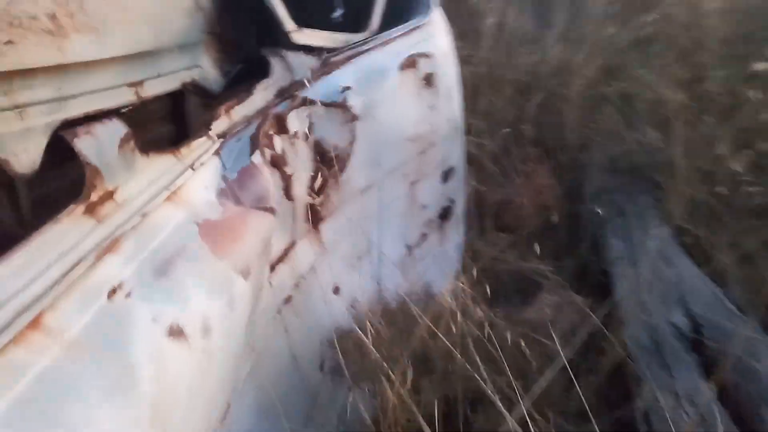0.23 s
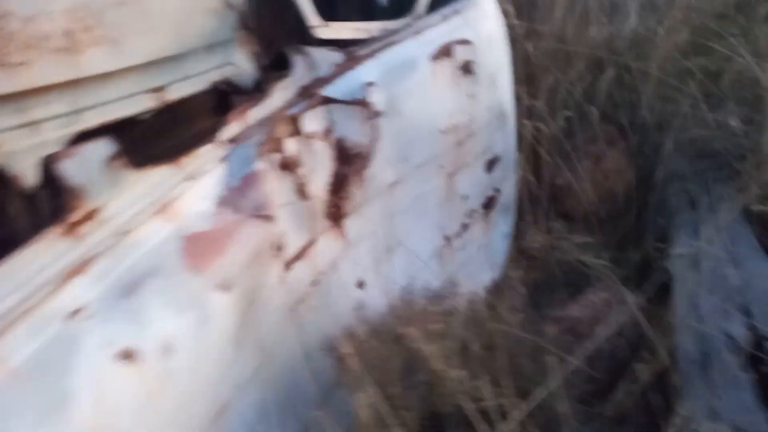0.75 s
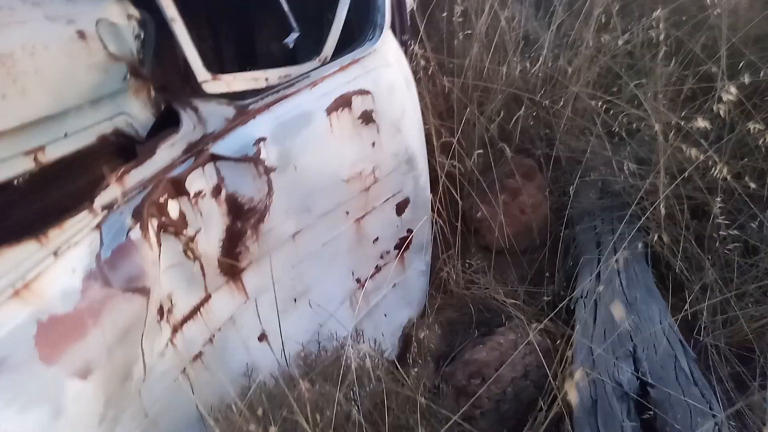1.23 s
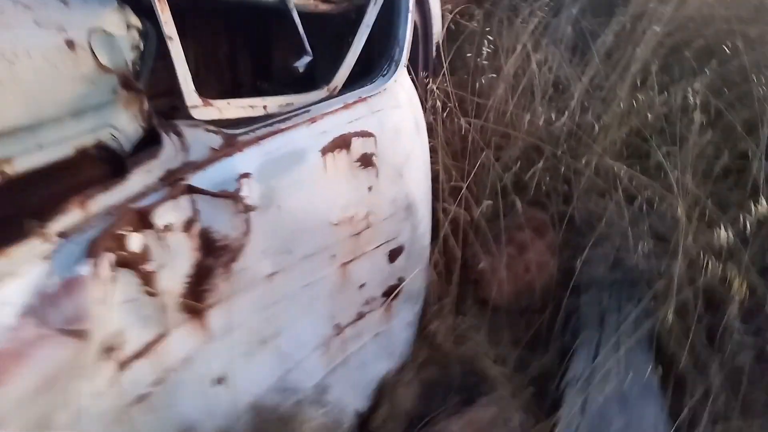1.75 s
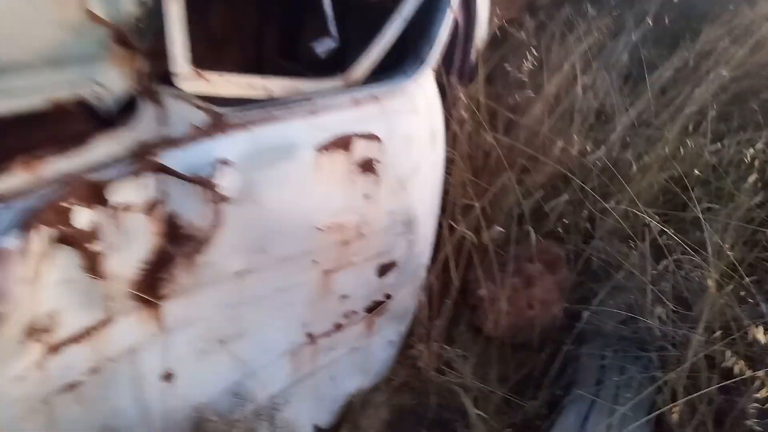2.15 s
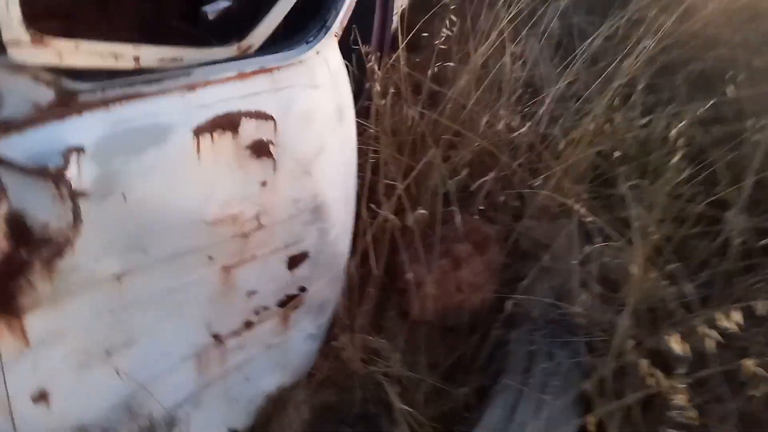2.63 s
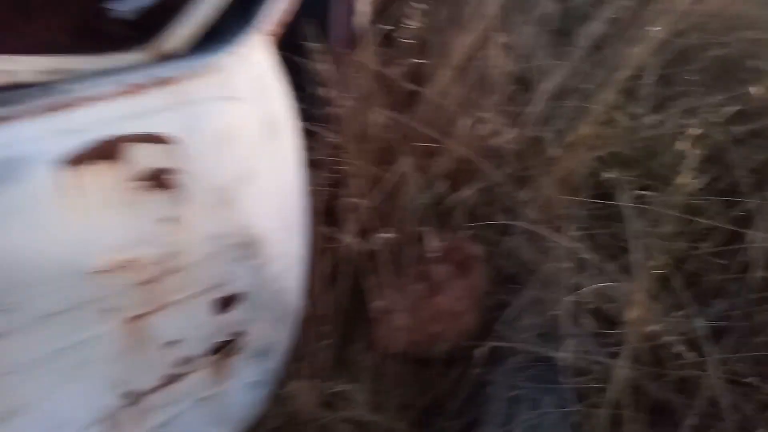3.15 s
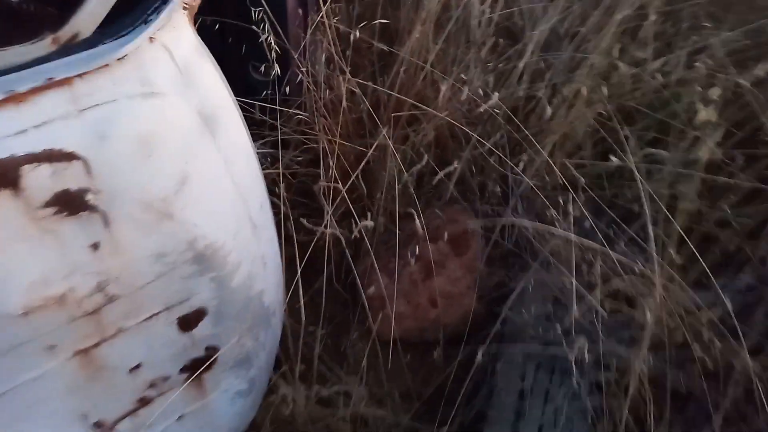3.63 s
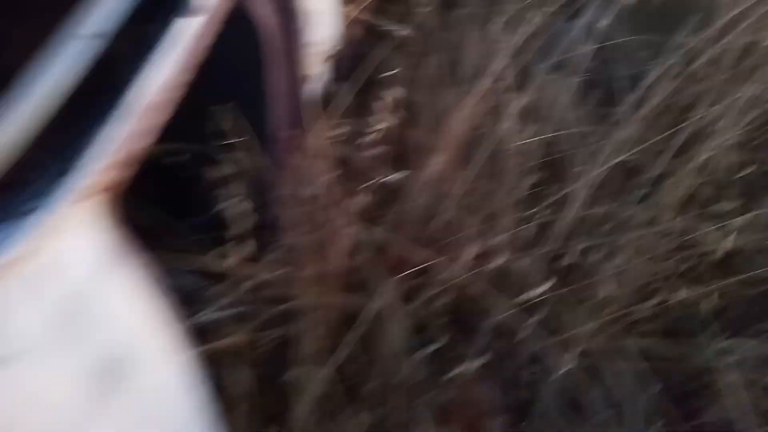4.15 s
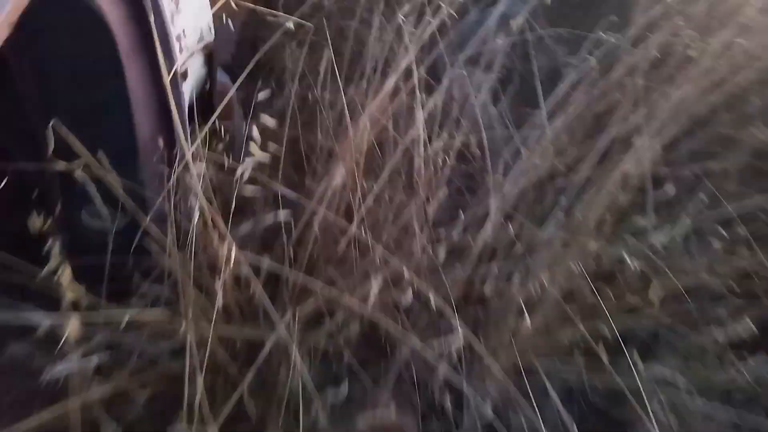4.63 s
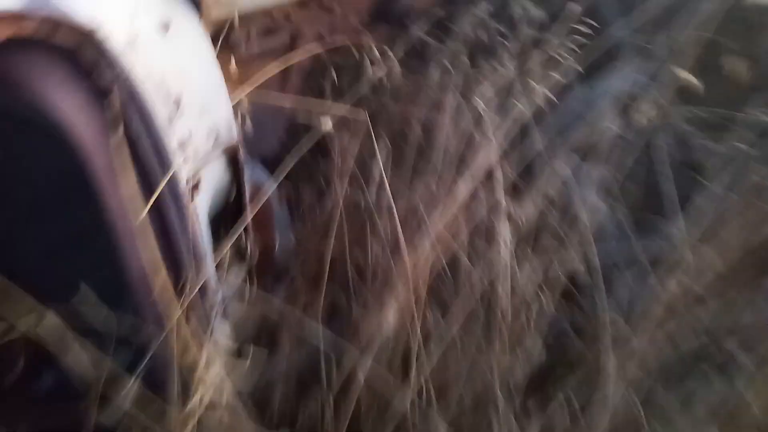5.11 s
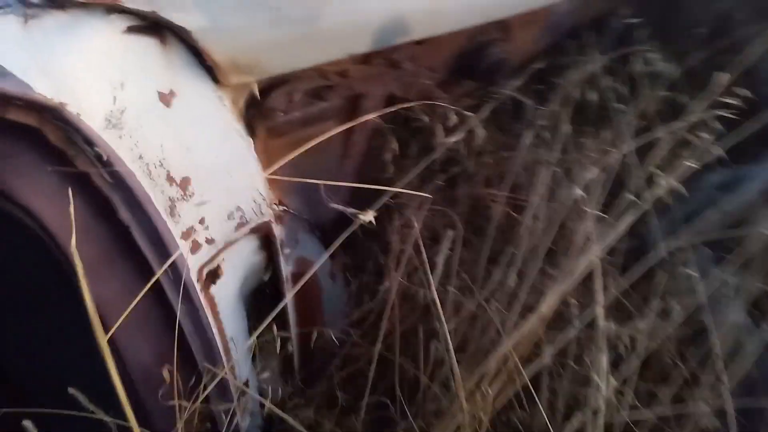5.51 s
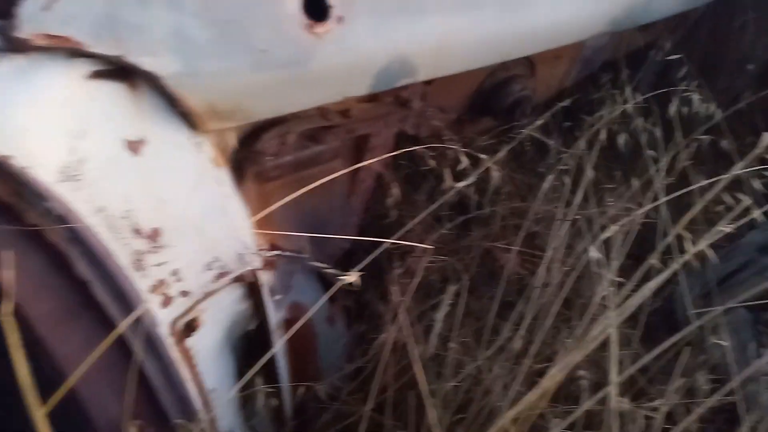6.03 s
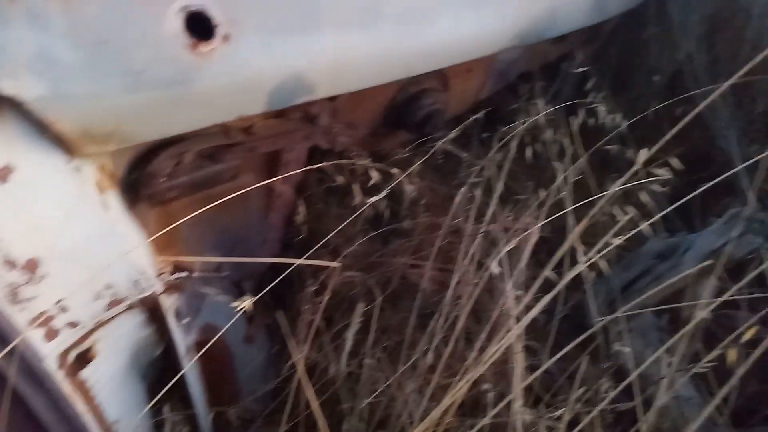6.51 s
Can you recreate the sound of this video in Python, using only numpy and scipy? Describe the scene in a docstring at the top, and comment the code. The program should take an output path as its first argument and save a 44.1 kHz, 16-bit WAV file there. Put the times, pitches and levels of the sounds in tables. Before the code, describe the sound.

Very close, dry outdoor sound of someone moving slowly through tall brittle grass, about seven seconds. From 0 to 0.6 s, a dense, bright burst of swishing with crisp ticks, snaps and soft low thuds. A gentler brush follows near 0.9 to 1.3, then sparse snaps and a firm thud with a crack at 1.8. Another strong, fizzy sweep peaks around 2.15. Small rustles, low handling bumps and quiet footfalls continue, the bump strongest near 2.75. At 3.2 to 3.5 a brush ends in woody cracks and thuds; at 3.7 a bunch snaps loudly and sharply. It quiets, with a soft swish at 4.2. From 4.8 the treble closes down; duller brushes come at 5.2 to 5.5. After 5.7 it is nearly still: a thin, faint high hiss, tiny muffled rustles around 6.4, and a last brush near 6.8.

```python
"""Dry stalks swish, tick and snap from the start, as someone wades slowly through tall grass.
Filtered noise and ticks make the swish, short ringing bursts the snaps, soft low pushes the thuds.
Air and grip bump the handheld microphone with lumpy low noise; past the middle one bunch cracks loudly.
Near the end something, perhaps a hand, shades the microphone port: the treble goes, the port rings lower,
and a thin high hiss that was barely there grows."""
import sys
import numpy as np
from scipy import signal
from scipy.fft import rfft, irfft, next_fast_len
from scipy.io import wavfile
from scipy.ndimage import uniform_filter1d

SR = 44100
rng = np.random.default_rng(int(sys.argv[2]) if len(sys.argv) > 2 else 0)


def to_wav(sig):
    """Store sig (one row per channel, or 1-D mono) as 16-bit WAV at the path in sys.argv[1].

    Samples outside -1..1 are clipped; the rate is SR.
    """
    pcm = np.clip(np.atleast_2d(sig), -1, 1) * 32767
    pcm = np.round(pcm).astype(np.int16)
    wavfile.write(sys.argv[1], SR, pcm.T)  # frames by channels


N = 298716  # length in samples

# Legs sweeping through stalks: full at t/s, held t/s, swish level/dB, rise in s per 10 dB,
# fall in s per 10 dB, rustle level/dB against the swish, thick stems level/dB against the swish
STROKES = [(.01, .08, -50, .1, .1, -10, -19), (.13, .02, -45.5, .06, .07, -6, -8),
           (.281, .005, -43.5, .05, .045, -7, -12), (.368, .005, -48, .07, .07, -9, -15),
           (.5, .02, -53, .2, .08, -4, -14), (.6, .005, -54, .07, .18, -3, -13),
           (.904, .22, -52.5, .12, .4, -6, -15), (1.43, .005, -56, .2, .09, -8, -19),
           (1.72, .005, -62, .08, .1, -1.5, -4), (1.8, .005, -56, .06, .06, 5, .1),
           (1.864, .22, -52.5, .08, .3, -7, -18), (2.17, .054, -44, .1, .06, -9, -20),
           (2.39, .005, -55, .15, .12, -9, -15), (2.551, .005, -56, .04, .05, 4, -11),
           (2.662, .005, -59, .08, .05, 1.1, -7), (2.765, .005, -64, .05, .05, 3, -9),
           (2.854, .005, -63, .05, .05, 5, 1.5), (2.936, .04, -61, .04, .06, 3, -6),
           (3.066, .06, -53, .1, .25, -1.5, -15), (3.33, .09, -57, .1, .025, -10, -25),
           (3.519, .005, -58, .08, .035, -6, 1.1), (3.64, .005, -62, .15, .05, -8, -16),
           (3.725, .005, -60, .02, .025, 19, 8), (3.79, .005, -66, .05, .2, -6, -11),
           (3.97, .005, -69, .06, .05, -6, -12), (4.081, .005, -65, .07, .07, -7, -3),
           (4.205, .18, -55.5, .007, .06, -8, -21), (4.537, .005, -63, .1, .12, -4, -9),
           (4.682, .005, -57, .07, .08, -6, -15), (4.858, .005, -56.5, .08, .07, -6, -3),
           (5.008, .005, -61, .07, .05, .1, -.6), (5.11, .005, -63.5, .05, .04, -3, 1.1),
           (4.79, .005, -65, .04, .04, 1.5, -9), (5.177, .005, -55.5, .08, .12, -11, -30),
           (5.314, .005, -49.5, .08, .09, -1.5, -18), (5.513, .005, -50.5, .045, .04, -7, -26),
           (5.598, .005, -63.5, .05, .02, 1.5, -11), (5.74, .02, -67, .12, .07, -15, -15),
           (6.33, .005, -62, .03, .06, -13, -24), (6.39, .005, -62, .04, .05, -8, -23),
           (6.46, .005, -61, .04, .055, -14, -21), (6.685, .005, -62, .04, .1, -7, -13),
           (6.77, .005, -57, .09, .1, -15, -25)]
# Swish of stalks settling between strokes: t/s, level/dB
SETTLING = [(0, -60), (.8, -67), (1.58, -73), (2.3, -67), (2.75, -74), (3.3, -68), (3.8, -72), (4.17, -76),
            (4.9, -68), (5.5, -69), (5.65, -77), (5.9, -80), (6.77, -80)]
# Colour of the grass through the free port: f/Hz, level/dB
OPEN_PORT = [(50, -44), (120, -22), (250, -10), (600, -9), (1200, -11), (2100, -6), (5000, -6), (6600, -1),
             (8000, -5), (8900, 0), (9400, -2), (10400, -13), (13500, -21), (14600, -8), (15700, -9)]
# Colour of the grass through the shaded port: f/Hz, level/dB
SHADED_PORT = [(50, -40), (120, -23), (250, -19), (600, -28), (1200, -26), (2500, -19.5), (3700, -13),
               (5400, -6.5), (6750, -2), (7450, -3), (8300, -16), (9700, -33.5), (12600, -49), (14000, -34),
               (15200, -24)]
# How far the port is shaded: t/s, share of the shaded colour (0 to 1)
SHADE = [(4.5, 0.11), (4.9, 0.31), (5.1, 0.7), (5.3, 0.9), (5.55, 0.87), (5.7, 0.95)]
# Borders between thick stems, rustle, swish and fizz: f/Hz
PART_EDGES_HZ = (1200, 4000, 13200)
# Middle pitch of the ticks of each stalk size: f/Hz
STALK_HZ = (700, 1600, 3000, 5000, 7500, 11000)
# Air and grip on the microphone: t/s, level/dB, rise in s per 10 dB, fall in s per 10 dB
BUMPS = [(.15, -62, .035, .035), (.26, -76, .06, .06), (.47, -71, .07, .045), (.94, -76, .1, .17),
         (1.49, -85, .2, .2), (1.795, -65, .014, .035), (1.9, -73, .08, .08), (2., -67, .08, .04),
         (2.11, -70, .06, .06), (2.42, -70, .06, .08), (2.535, -63, .035, .011), (2.63, -66, .03, .04),
         (2.7, -58, .025, .025), (2.745, -52, .02, .035), (2.865, -67, .04, .022), (2.97, -57, .03, .014),
         (3.36, -82, .06, .02), (3.49, -67, .015, .025), (3.58, -75, .015, .04), (3.69, -72, .01, .035),
         (3.85, -75, .045, .07), (4.02, -82, .04, .12), (4.3, -88, .2, .2), (4.53, -71, .045, .035),
         (4.64, -77, .08, .05), (4.815, -69, .014, .018), (4.88, -76, .02, .09), (5.07, -69, .09, .016),
         (5.22, -75, .045, .11), (5.6, -82, .03, .05), (5.79, -82, .1, .06), (6.15, -90, .3, .3),
         (6.47, -80, .12, .035), (6.73, -77, .08, .2)]
# Colour of the bumps: f/Hz, level/dB
BUMP_COLOUR = [(18, -37.5), (30, -28), (51, -4.5), (75, 1), (146, -5.5), (180, -11), (230, -33),
               (400, -120)]
# Thin hiss at full shade: middle f/Hz, width f/Hz, level/dB
THIN_HISS = (7300, 310, -69)
# Feet and thick stems meeting the ground: t/s, peak level/dB, ring f/Hz
THUDS = [(.072, -50, 496), (.142, -45.5, 567), (.289, -52, 517.8), (.355, -53, 357), (.525, -59, 385),
         (.851, -55, 436), (1.004, -58, 340.4), (1.434, -49, 490), (1.471, -53.5, 290), (1.615, -52.5, 600),
         (1.784, -38, 611.9), (1.808, -46.5, 304), (2.22, -52, 427), (2.376, -58, 322.3), (2.501, -50, 573),
         (2.542, -47.5, 569.8), (2.66, -54.5, 233), (2.759, -47.5, 440), (2.854, -57, 502.4),
         (2.919, -51, 416.3), (3.223, -49, 749.2), (3.443, -47.5, 350), (3.473, -39, 325),
         (3.499, -43, 276.2), (3.71, -32.5, 527), (3.722, -41, 282), (3.76, -48, 242), (3.834, -57, 164.3),
         (4.043, -64, 332), (4.468, -60.5, 275.5), (4.59, -63.5, 484), (4.741, -60, 352), (4.808, -58, 323),
         (4.842, -47.5, 317.3), (4.981, -61, 566), (5.042, -62, 149), (5.06, -61, 146), (5.09, -62, 450),
         (5.588, -59.5, 267.2), (6.663, -65.5, 220.6)]
# Stalks breaking at set moments, from faint to loud: t/s, peak level/dB, ring f/Hz,
# thick part level/dB, fine part level/dB (both parts are set against the middle of the snap)
SNAPS = [(.0747, -21.5, 6800, -41, -29), (.0785, -32, 7300, -21, -19), (.1338, -25, 6400, -27, -25),
         (.1454, -29, 9000, -30, -23), (.1522, -27, 5860, -23, -18), (.1583, -33, 7860, -0.5, -19),
         (.1634, -36, 5000, -21, -18), (.249, -29, 8700, -31.5, -25), (.2693, -34.5, 5040, -17, -21),
         (.2754, -34, 5500, -24, -26), (.2867, -27, 9060, -27, -23), (.2918, -29.5, 6620, -31, -17),
         (.2974, -36, 7000, -30, -16), (.3061, -30, 9100, -38, -23), (.3446, -27, 6800, -41, -21),
         (.3604, -25, 9470, -28, -22.5), (.3783, -28.5, 8500, -13, -18), (.385, -29.5, 6540, -18, -14),
         (.4607, -31.5, 5040, -28.5, -27), (.5004, -40, 5000, -27, -24), (.5293, -28.5, 3500, -23, -31),
         (.537, -34.5, 3560, -34, -34), (.587, -26.5, 3150, -16.5, -17), (.6, -31, 5800, -32.5, -18),
         (.637, -31, 6900, -31, -31), (1.0148, -39, 4500, 6.5, -18.5), (1.1017, -36, 8900, -31, -22),
         (1.2448, -37, 8840, -36.5, -11.5), (1.2852, -35.5, 8880, -16, -4), (1.3188, -26, 6000, -13, -28),
         (1.4268, -24.5, 2780, 1.5, -43), (1.4697, -36.5, 7000, -26, -27), (1.6404, -30.5, 3600, -18, -29),
         (1.657, -36, 4630, -20, -21), (1.684, -37, 9180, -12, -2), (1.782, -32.5, 2360, -10.5, -9),
         (1.7882, -22, 3200, -11, -19), (1.8126, -28.5, 3640, -12, -2), (1.8327, -33.5, 3670, -23, -20),
         (1.951, -37, 8990, -34, -28), (2.0128, -37, 8600, -35, -28), (2.0632, -36.5, 9400, -30, -20),
         (2.1273, -30, 8400, -31.5, -15), (2.1437, -24.5, 8880, -46, -22), (2.153, -18.5, 8900, -52, -8),
         (2.1778, -25, 7040, -34.5, -4), (2.1938, -26.5, 8990, -35.5, -12), (2.199, -24.5, 2930, -22, -21),
         (2.2182, -34, 7320, -21, -21), (2.2404, -33, 6630, -24.5, -22), (2.4264, -38, 8600, -34, -20),
         (2.5454, -25.5, 2600, -4, -31), (2.5539, -31.5, 4000, -27, -33.5), (2.665, -36.5, 2060, -11, -19),
         (2.8116, -41, 3440, -24, -35), (2.8403, -43.5, 3710, -24, -28), (2.9034, -37.5, 7190, -23, 18),
         (2.9178, -45, 3040, -8.5, -22), (2.936, -42.5, 1870, -15, -22), (3.222, -24, 3980, -34, -21),
         (3.2274, -33, 2650, -30, -35), (3.2754, -37.5, 4180, -22.5, -19), (3.2882, -29.5, 4000, -38, -9),
         (3.3084, -52, 6630, -21, -19), (3.3613, -40, 6000, -32.5, -25), (3.4396, -35, 1840, -9, -35),
         (3.4662, -35, 3280, -4, -43), (3.47, -30, 2720, -26.5, -45.5), (3.4745, -23, 1800, 4.5, -41.5),
         (3.4779, -19.5, 1410, -28, -42), (3.4874, -34, 3000, -28.5, -47), (3.4917, -31, 2200, -6, -33),
         (3.4953, -28.5, 1800, -2, -58.5), (3.497, -21, 1430, 5, -46.5), (3.5009, -30.5, 2290, -8.5, -40.5),
         (3.549, -41.5, 2680, -26, -23), (3.5926, -43.5, 3548, -27, -26.5), (3.6084, -41.5, 5000, -29, -30),
         (3.6268, -39, 3260, -42, -36.5), (3.6606, -41.5, 1840, -28.5, -37.5), (3.669, -43, 3350, -27, -36),
         (3.6744, -36, 3910, -21, -21.5), (3.683, -28, 6560, -31, -31), (3.6943, -15.5, 3700, -26, -36.5),
         (3.697, -13, 3980, -34, -42.5), (3.7054, -18.5, 4250, -25.5, -30), (3.7095, -18, 3500, -4, -24.5),
         (3.712, -18.5, 5980, -29, -39.5), (3.7165, -22.5, 2210, -13.5, -27),
         (3.7225, -27, 2470, -17.5, -38), (3.7318, -24, 2500, -19, -43), (3.744, -43, 6220, -25.5, -30.5),
         (3.7637, -33, 1590, -12, -28.5), (4.0336, -46.5, 6240, -19, -29), (4.0802, -48, 2700, -6, -27),
         (4.12, -47, 3760, -5, -25), (4.1972, -36, 7040, -40, -24), (4.2382, -34.5, 7850, -31, -11),
         (4.3785, -44, 6200, -40, -14), (4.589, -43.5, 4000, -25, -20.5), (4.6873, -42, 5000, -4, -27),
         (4.8422, -27, 2400, -38.5, -42), (4.8476, -31, 1930, -15, -39), (4.8702, -38.5, 3000, 4, -34),
         (5.0067, -47.5, 2700, -14, -39), (5.1658, -37.5, 6440, -45, -31),
         (5.1949, -36.5, 6300, -51.5, -34), (5.244, -44, 4350, -36, -40.5), (5.2883, -36, 6000, -18, -41),
         (5.3096, -41, 6400, -19, -41), (5.447, -43.5, 5000, -14, -38), (5.4914, -37, 6500, -40, -30),
         (5.5056, -35.5, 5000, -35, -33), (5.59, -49, 1500, 8.5, -34), (5.7554, -57, 6850, -35, -42),
         (5.7725, -57, 6690, -34, -49), (6.322, -49.5, 7000, -40, -45)]

EDGE_HZ = 15750  # nearly nothing sounds above this
TICKS_PER_S = 180  # for each stalk size
TICK_SPREAD_DB, TICK_SHARE = 4.8, .45  # the rest of the swish is smooth hiss
SETTLING_WEIGHT_DB, SETTLING_THICK_DB = -11, -18.5  # rustle and thick stems, against the settling swish
THICK_FLOOR_DB, FIZZ_FLOOR_DB = -85, -103  # always present, even between strokes
# Fizz is the top part, set against the swish: harder, lighter strokes fizz more, a shaded port dulls it
FIZZ_DB, FIZZ_PER_DB, FIZZ_PER_WEIGHT, FIZZ_SHADED_DB = -11.5, .4, -.36, -17
USUAL_SWISH_DB = -55
PATCHES_DB, LONG_PATCHES_DB = .99, 2  # uneven patches; narrower, longer-lasting unevenness of the swish
CALM_DB, CALM_LUMPS_DB = -92, 2.5  # the air between bumps
THUD_T60_S, KNOCK_T60_S = .086, .021  # time to fade by 60 dB
CRACK_T60_S, RATTLE_T60_S = .0032, .026
# Thin, high-ringing stalks break brighter
BRIGHT_DB, BRIGHT_DB_PER_OCTAVE, USUAL_RING_HZ = -1.6, 9, 4000
STALK_LUMPS_DB = 2.5  # uneven ring of each broken stalk
# More breaks fall by chance: the faintest lie about CHANCE_DB above the swish, so strong strokes snap louder
CHANCE_PER_S, CHANCE_DB, CHANCE_SPREAD_DB = 14, 6.5, 2.5
CHANCE_HZ = (3000, 9233.7)  # lowest and highest ring
CHANCE_THICK_DB, CHANCE_FINE_DB = -25.5, -22


def gain_of(db):
    """Turns decibels into a gain."""
    return 10 ** (np.asarray(db) / 20)


def evened(x):
    """Scales to an average strength (rms) of 1."""
    return x / np.sqrt(np.mean(x ** 2) + 1e-20)


def read(points, hz):
    """Reads a colour between its points, with pitch on a logarithmic scale."""
    f, value = np.transpose(points)
    return np.interp(np.log(hz + 1), np.log(f + 1), value)


def causal(gain):
    """Gives each row of gains the phase of a filter that rings only after its blow."""
    log = np.log(gain + 1e-7)
    circle = np.concatenate([log, log[:, -2:0:-1]], axis=1)
    phase = -signal.hilbert(circle, axis=1).imag[:, :gain.shape[1]]
    return gain * np.exp(1j * phase)


def swells(t, s, held, rise, fall):
    """Gains, events x moments: each event rises, holds and falls along straight lines in dB."""
    after = t - s[:, None]
    rising = np.maximum(-after, 0) / rise[:, None]
    falling = np.maximum(after - held[:, None], 0) / fall[:, None]
    return gain_of(-10 * (rising + falling))


def add(mix, starts, sounds):
    """Lays each sound into the mix at its time in s."""
    for start, one in zip(np.round(starts * SR).astype(int), sounds):
        part = mix[start:start + len(one)]
        part += one[:len(part)]


def shade_at(s):
    """Share of the shaded colour at times s."""
    return np.clip(np.interp(s, *np.transpose(SHADE)), 0, 1)


def grass_colour(s, hz, levels):
    """Power gain, moments x bins: the port colour cut in parts, low to high, each set to its own power."""
    shade = shade_at(s)[:, None]
    port_db = (1 - shade) * read(OPEN_PORT, hz) + shade * read(SHADED_PORT, hz)
    power = gain_of(port_db) ** 2
    below = [0 * hz]  # what lies below each border
    below += [1 / (1 + (hz / edge) ** (4 + edge / 1000)) for edge in PART_EDGES_HZ]
    below += [1 / (1 + (hz / EDGE_HZ) ** 80)]
    out = 0
    for low, high, level in zip(below, below[1:], levels):
        piece = power * np.clip(high - low, 1e-9, 1)
        out = out + piece / piece.mean(axis=1, keepdims=True) * level[:, None]
    return out


def brushing(t):
    """Power of thick stems, rustle, swish and fizz: all strokes and the settling stalks add up."""
    s, held, db, rise, fall, weight_db, thick_db = np.transpose(STROKES)
    strokes = gain_of(db)[:, None] * swells(t, s, held, rise, fall)
    settling = gain_of(np.interp(t, *np.transpose(SETTLING)))
    each = np.vstack([strokes, settling]) ** 2
    weight_db = np.append(weight_db, SETTLING_WEIGHT_DB)
    thick_db = np.append(thick_db, SETTLING_THICK_DB)

    thick = gain_of(thick_db) ** 2 @ each + gain_of(THICK_FLOOR_DB) ** 2
    rustle = gain_of(weight_db) ** 2 @ each
    swishing = each.sum(axis=0)
    harder_db = 10 * np.log10(swishing) - USUAL_SWISH_DB
    fizz_db = FIZZ_DB + FIZZ_PER_DB * harder_db + FIZZ_SHADED_DB * shade_at(t)
    fizz = gain_of(FIZZ_PER_WEIGHT * weight_db) ** 2 @ each * gain_of(fizz_db) ** 2
    return thick, rustle, swishing, fizz + gain_of(FIZZ_FLOOR_DB) ** 2


def ticks():
    """Sparse tiny ticks; each stalk size has its own and sounds in its own range of pitch."""
    length = next_fast_len(N)
    hz, out = np.fft.rfftfreq(length, 1 / SR), 0
    count = round(TICKS_PER_S * N / SR)
    for own in np.eye(len(STALK_HZ)):
        strikes = np.zeros(N)
        strength_db = TICK_SPREAD_DB * np.minimum(rng.exponential(1, count), 4.5)
        strikes[rng.integers(0, N, count)] = gain_of(strength_db)
        # each tick is a rattle that fades within milliseconds
        fading = signal.lfilter([1], [1, -np.exp(-1 / (.0027 * SR))], strikes)
        rattle = evened(fading * rng.standard_normal(N))
        pitch_range = np.sqrt(np.interp(hz, STALK_HZ, own))
        out = out + rfft(rattle, length) * pitch_range
    return evened(irfft(out, length)[:N])


def swish():
    """Stalks brush past: ticks over a smooth hiss, clumped in time and patchy in pitch."""
    clumps = gain_of(1.8 * evened(uniform_filter1d(rng.standard_normal(N), size=600)))
    mixed = TICK_SHARE * ticks() + (1 - TICK_SHARE) * rng.standard_normal(N)
    drive = evened(clumps * mixed)
    hz, t, z = signal.stft(drive, SR, nperseg=512, noverlap=384)
    power = grass_colour(t, hz, brushing(t))

    def smooth_noise(moments, bins):
        """Chance unevenness, smoothed over time and pitch."""
        along_time = uniform_filter1d(rng.standard_normal(power.shape), size=moments, axis=0)
        return evened(uniform_filter1d(along_time, size=bins, axis=1))

    uneven_db = PATCHES_DB * smooth_noise(8, 12) + LONG_PATCHES_DB * smooth_noise(24, 3)
    gain = causal(np.sqrt(power) * gain_of(uneven_db))
    return signal.istft(z * gain.T, SR, nperseg=512, noverlap=384)[1][:N]


def bumps():
    """Air and grip press on the microphone as low noise that swells and falls over a lumpy calm."""
    length = next_fast_len(N)
    colour = gain_of(read(BUMP_COLOUR, np.fft.rfftfreq(length, 1 / SR)))
    rumble = evened(irfft(rfft(rng.standard_normal(length)) * colour, length)[:N])
    s, db, rise, fall = np.transpose(BUMPS)
    t = np.arange(0, N + 64, 64) / SR
    lumps = evened(uniform_filter1d(rng.standard_normal(len(t)), size=50))
    calm = gain_of(CALM_DB + CALM_LUMPS_DB * lumps)
    bumping = gain_of(db) ** 2 @ swells(t, s, 0 * s, rise, fall) ** 2
    level = np.sqrt(bumping + calm ** 2)
    return rumble * np.interp(np.arange(N) / SR, t, level)


def thin_hiss():
    """Faint noise in one high resonance, slightly wavering, that follows the shade of the port."""
    centre_hz, width_hz, level_db = THIN_HISS
    length = next_fast_len(N)
    hz = np.fft.rfftfreq(length, 1 / SR)
    resonance = 1 / (1 + ((hz - centre_hz) / width_hz) ** 2)
    hiss = irfft(rfft(rng.standard_normal(length)) * resonance, length)[:N]
    waver = gain_of(1.1 * evened(uniform_filter1d(rng.standard_normal(N), size=1500)))
    return gain_of(level_db) * evened(hiss) * waver * shade_at(np.arange(N) / SR)


def thuds():
    """A soft low push swells for some milliseconds and rings loosely, led by a short dry knock."""
    s, peak_db, ring_hz = np.transpose(THUDS)
    t, hz = np.arange(8192) / SR, np.fft.rfftfreq(8192, 1 / SR)
    octaves = np.log2((hz + 1) / ring_hz[:, None])  # distance from the ring
    noise = rfft(rng.standard_normal((len(s), 8192)))
    swell = (1 - np.exp(-t / .0029)) * gain_of(-60 * t / THUD_T60_S)
    push = irfft(noise * np.exp(-(octaves / .8) ** 2)) * swell
    knock_fade = gain_of(-9 - 60 * t / KNOCK_T60_S) * np.minimum(t / .00055, 1)
    knock = irfft(noise * np.exp(-(octaves - 1.6) ** 2)) * knock_fade
    sound = push + knock
    out = np.zeros(N)
    add(out, s, sound * gain_of(peak_db)[:, None] / abs(sound).max(axis=1, keepdims=True))
    return out


def chance_snaps():
    """More breaks drawn by chance, as rows like those of SNAPS."""
    when, size, pitch = rng.random((round(CHANCE_PER_S * N / SR), 3)).T
    s = when * N / SR
    swish_db = 10 * np.log10(brushing(s)[2])
    peak_db = swish_db + CHANCE_DB - CHANCE_SPREAD_DB * np.log(size + .02)
    ring_hz = CHANCE_HZ[0] + (CHANCE_HZ[1] - CHANCE_HZ[0]) * pitch
    fine_db = CHANCE_FINE_DB + FIZZ_SHADED_DB * shade_at(s)
    return np.transpose([s, peak_db, ring_hz, CHANCE_THICK_DB + 0 * s, fine_db])


def snaps():
    """Each break is a sudden burst that dies fast and rings broadly at the pitch of its stalk."""
    s, peak_db, ring_hz, thick_db, fine_db = np.vstack([SNAPS, chance_snaps()]).T
    bright_db = BRIGHT_DB + BRIGHT_DB_PER_OCTAVE * np.log2(ring_hz / USUAL_RING_HZ)
    t, hz = np.arange(2048) / SR, np.fft.rfftfreq(2048, 1 / SR)
    crack = gain_of(-60 * t / CRACK_T60_S)
    rattle = gain_of(-6.5 - 60 * t / RATTLE_T60_S)
    onset = np.minimum(t / .0001, 1)
    burst = rng.standard_normal((len(s), 2048)) * (crack + rattle) * onset

    ring = gain_of(5 * np.exp(-(np.log((hz + 1) / ring_hz[:, None]) / .3) ** 2))
    uneven = evened(uniform_filter1d(rng.standard_normal(ring.shape), size=8, axis=1))
    lumps = gain_of(STALK_LUMPS_DB * uneven)
    parts = gain_of([thick_db, -bright_db / 2, bright_db / 2, fine_db]) ** 2
    power = grass_colour(s, hz, parts)
    sound = irfft(rfft(burst) * causal(np.sqrt(power) * ring * lumps))
    out = np.zeros(N)
    add(out, s, sound * gain_of(peak_db)[:, None] / abs(sound).max(axis=1, keepdims=True))
    return out


def scene():
    """All sources add up at one microphone."""
    return (swish() + bumps() + thin_hiss() + thuds() + snaps())[None]


def record(dry):
    """The small microphone loses the deepest bass; then the highest treble is cut off."""
    bass_cut = signal.butter(3, 40., "high", fs=SR, output="sos")
    thinned = signal.sosfilt(bass_cut, dry)
    treble_cut = signal.firwin(1023, EDGE_HZ, window=("kaiser", 9), fs=SR)
    return signal.oaconvolve(thinned, treble_cut[None], "same")


dry = scene()
out = record(dry)
to_wav(out)
```